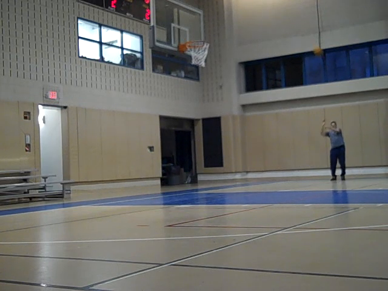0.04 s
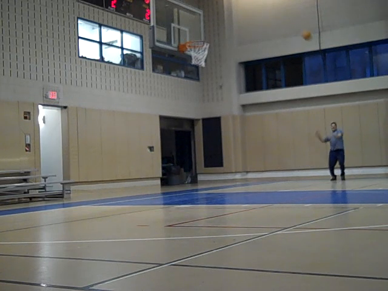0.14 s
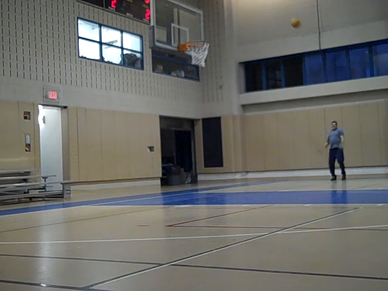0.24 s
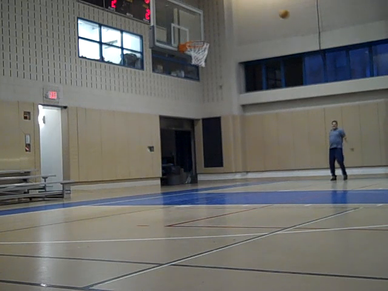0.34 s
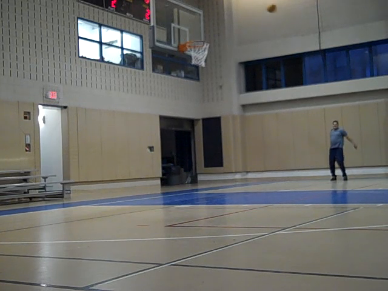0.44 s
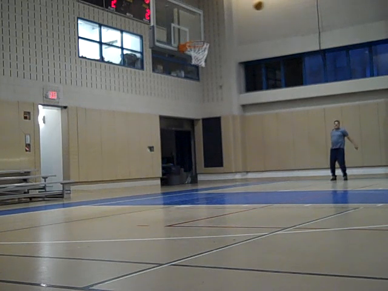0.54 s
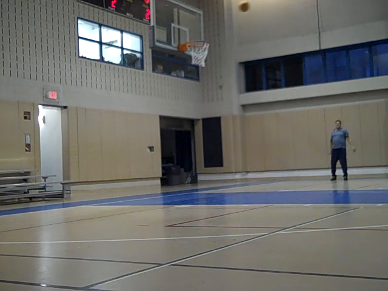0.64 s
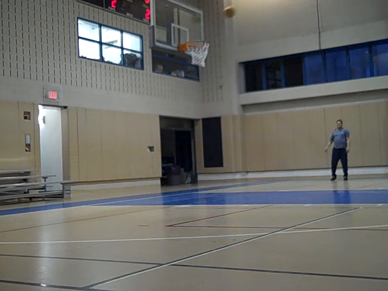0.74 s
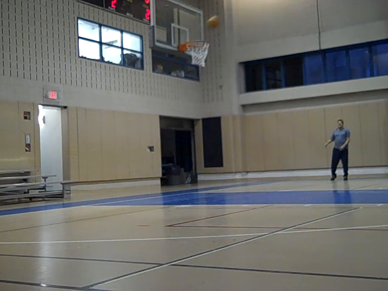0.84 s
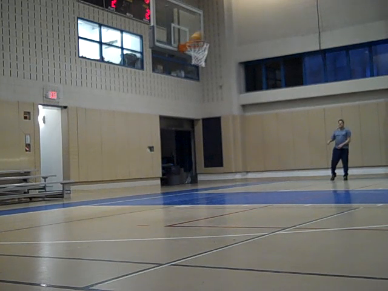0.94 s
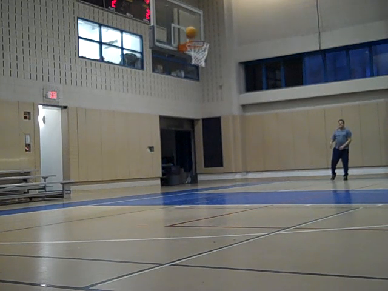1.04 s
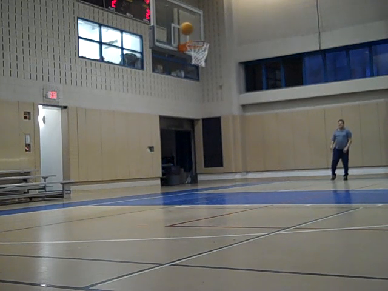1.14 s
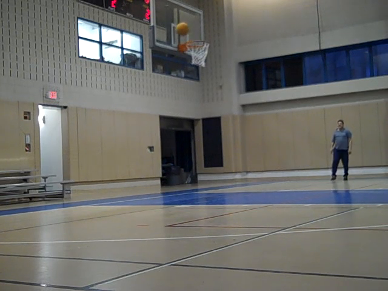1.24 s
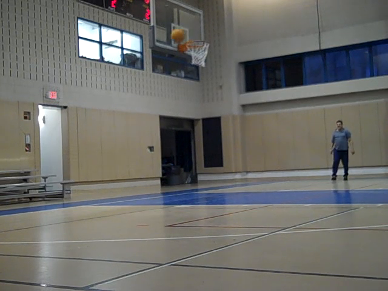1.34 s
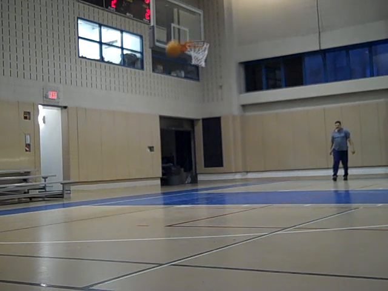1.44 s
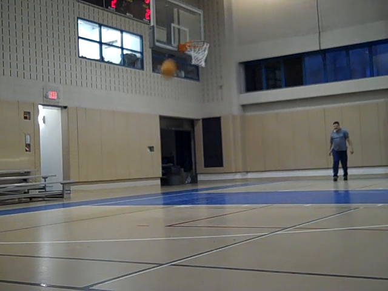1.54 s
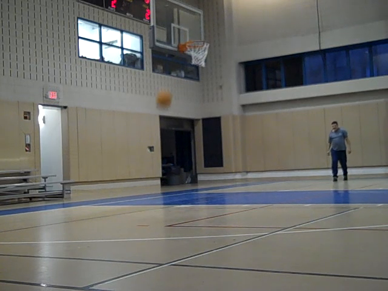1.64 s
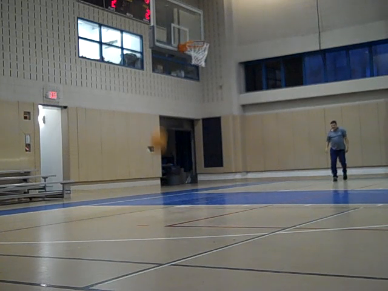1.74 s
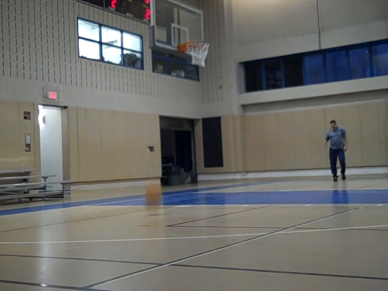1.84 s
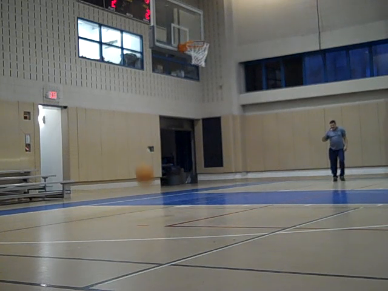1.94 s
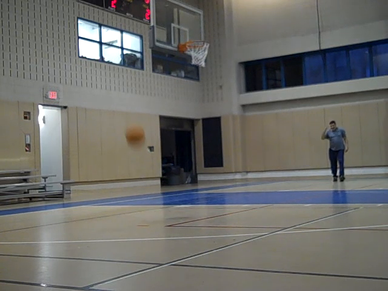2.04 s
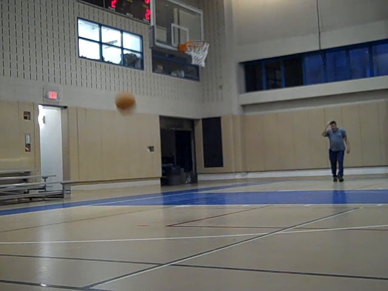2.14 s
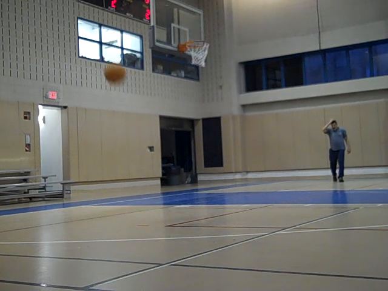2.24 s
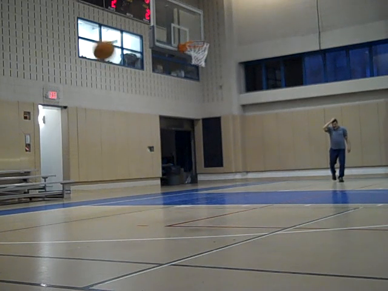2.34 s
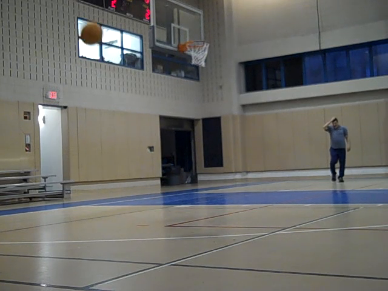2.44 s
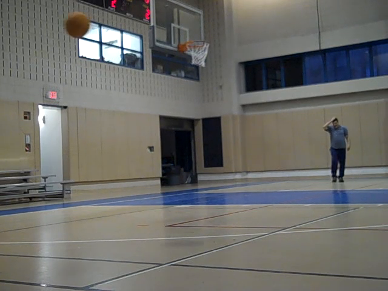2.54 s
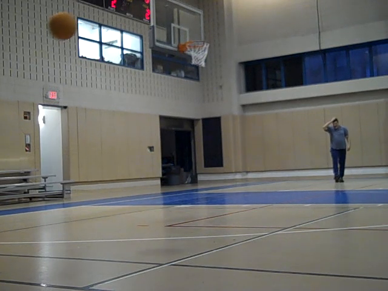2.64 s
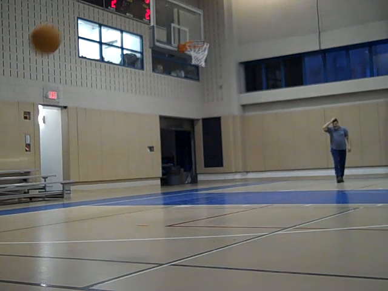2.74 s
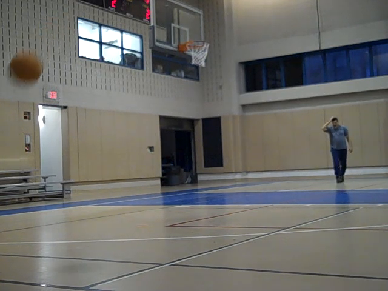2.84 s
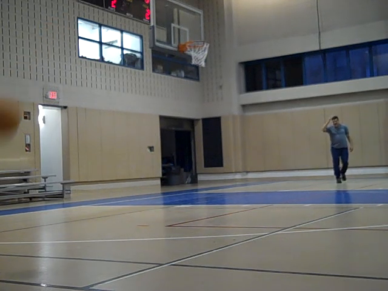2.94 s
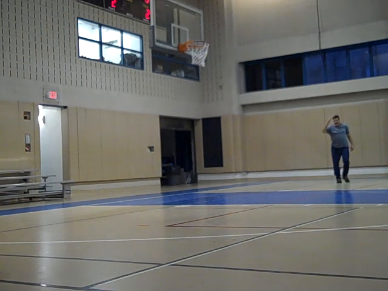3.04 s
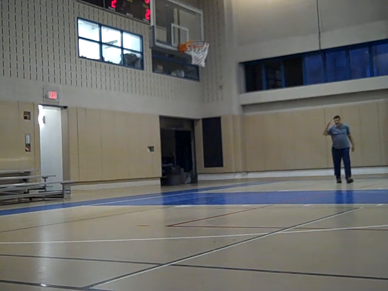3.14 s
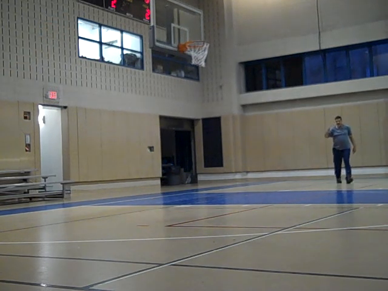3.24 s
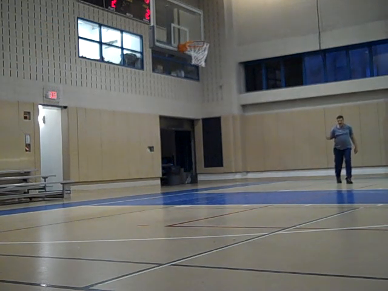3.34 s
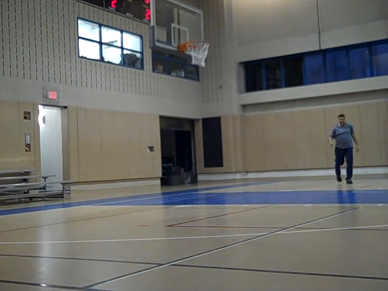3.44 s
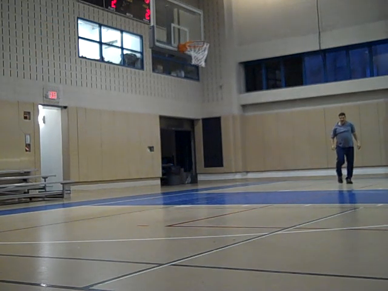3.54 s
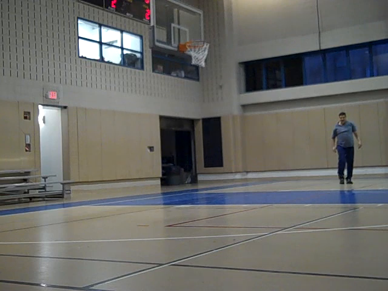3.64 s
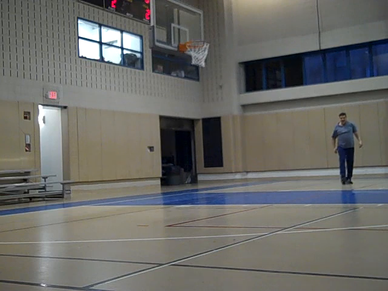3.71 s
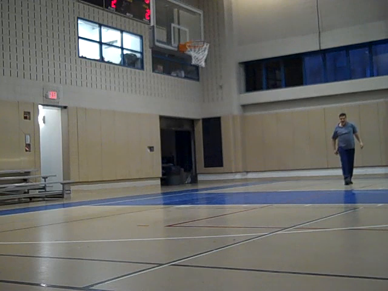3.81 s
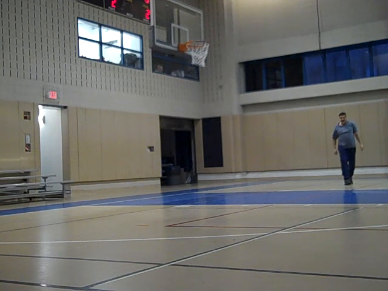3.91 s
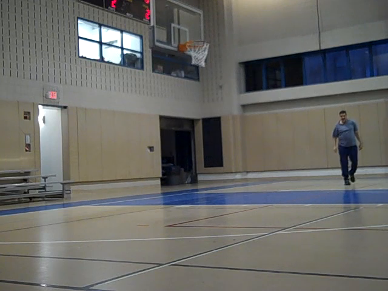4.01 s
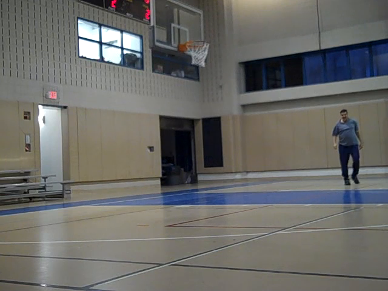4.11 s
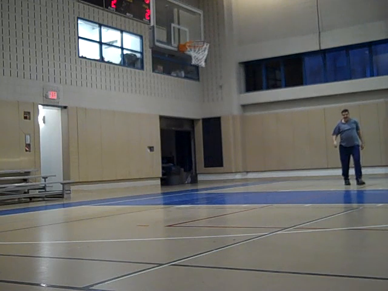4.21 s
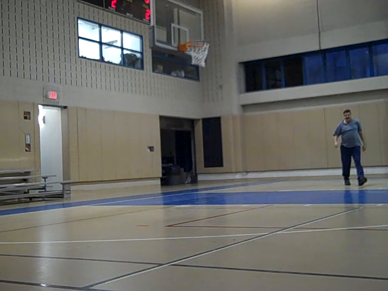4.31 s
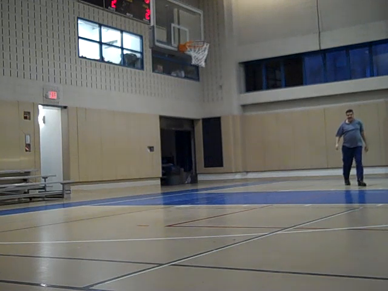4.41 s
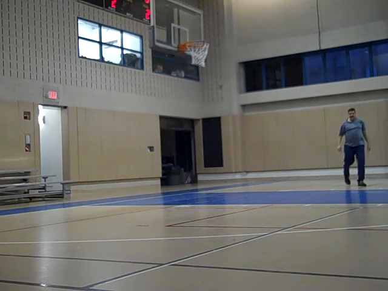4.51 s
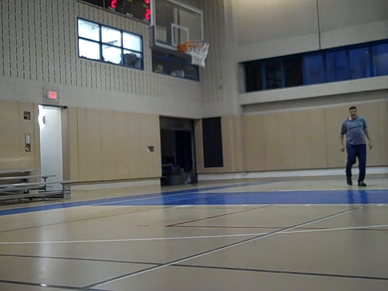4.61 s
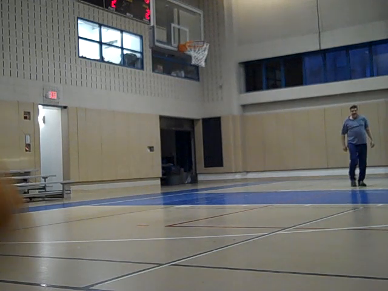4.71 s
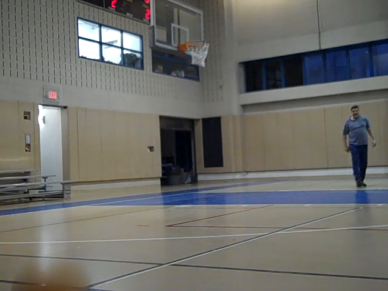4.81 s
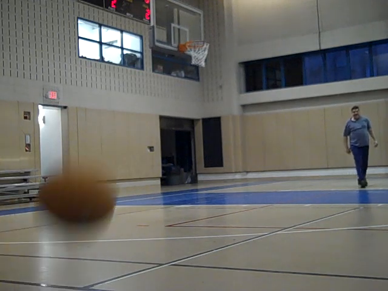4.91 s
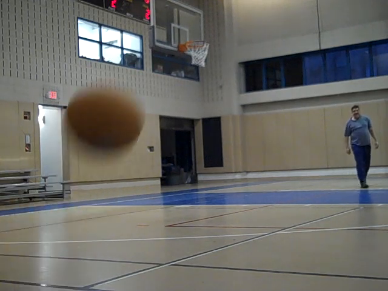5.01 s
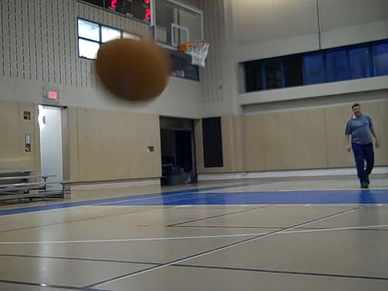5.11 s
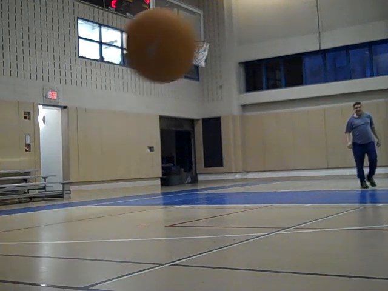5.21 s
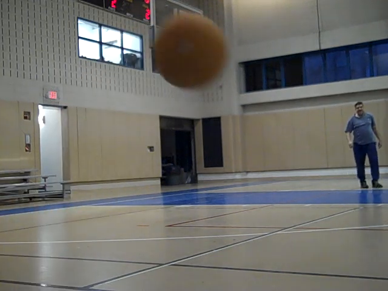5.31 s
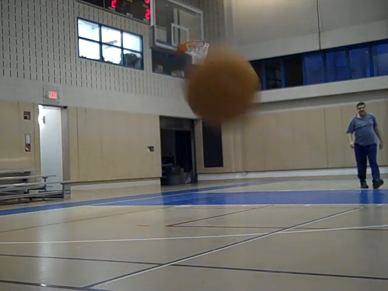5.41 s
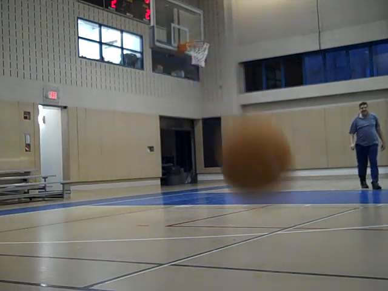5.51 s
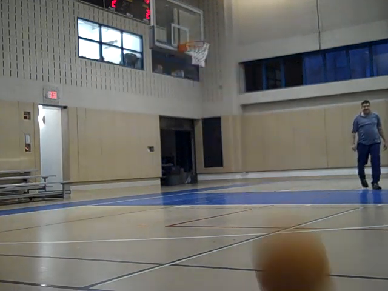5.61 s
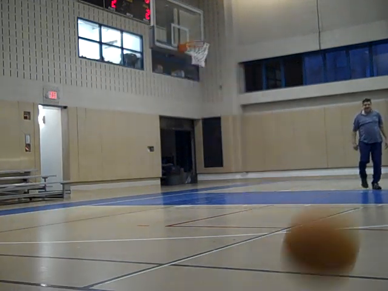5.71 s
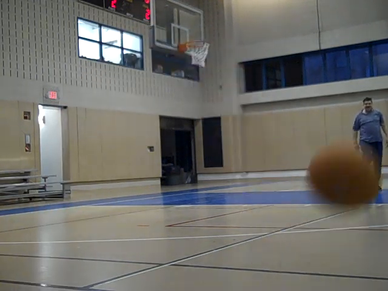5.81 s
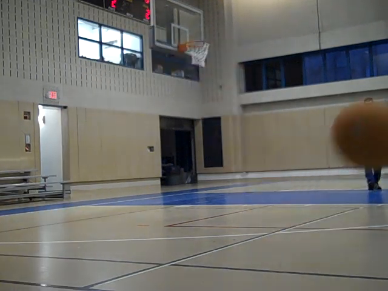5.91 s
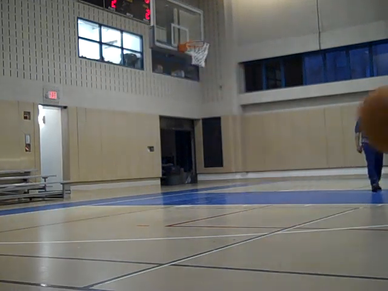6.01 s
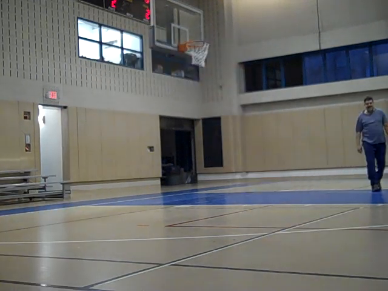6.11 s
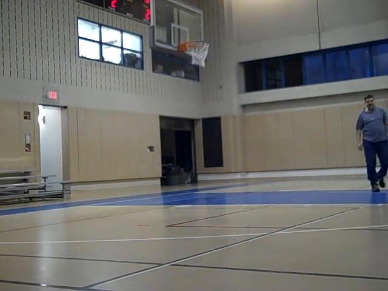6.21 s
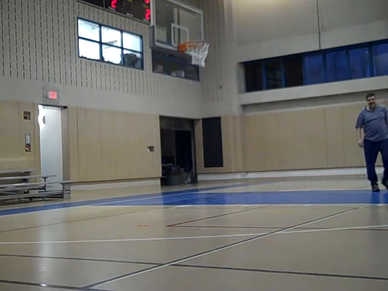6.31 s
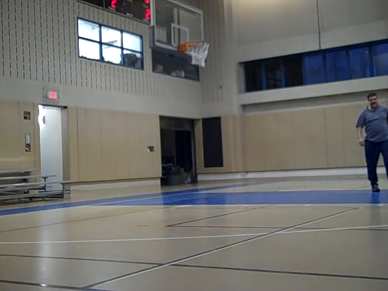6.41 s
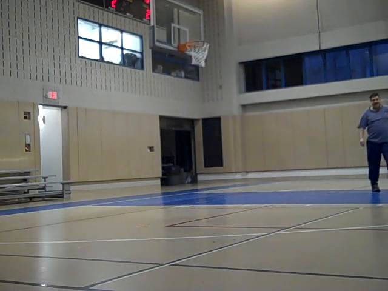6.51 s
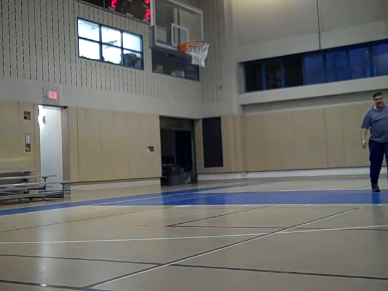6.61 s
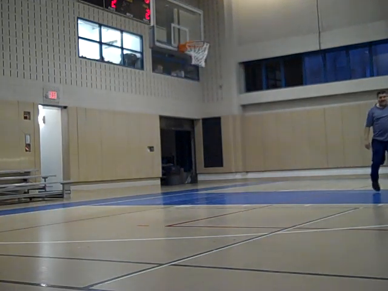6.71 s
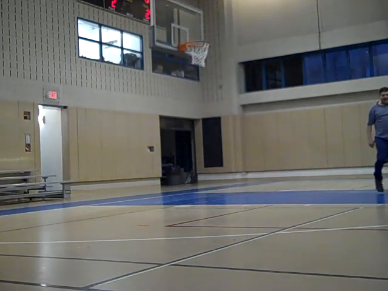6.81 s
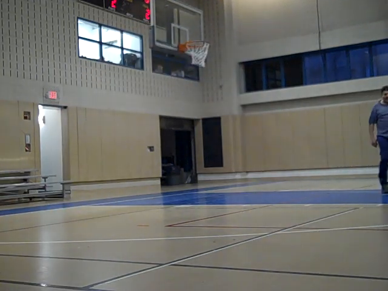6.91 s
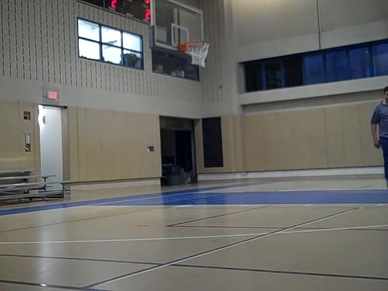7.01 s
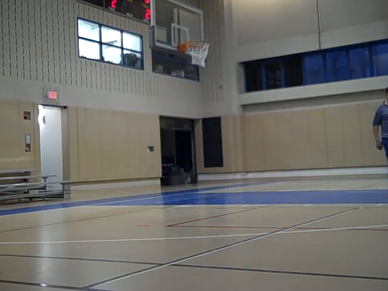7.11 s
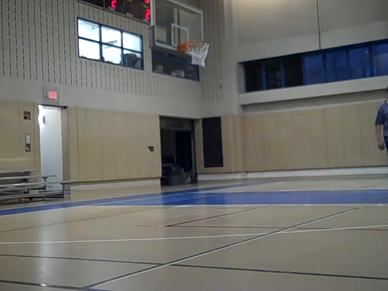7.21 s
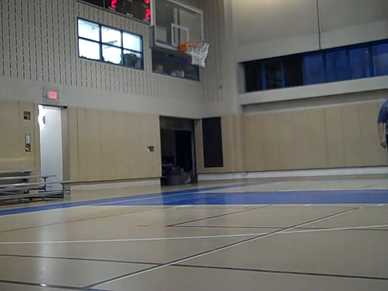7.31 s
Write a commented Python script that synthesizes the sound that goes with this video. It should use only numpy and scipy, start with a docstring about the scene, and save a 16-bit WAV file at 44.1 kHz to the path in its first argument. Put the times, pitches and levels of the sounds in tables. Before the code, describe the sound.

In a large empty gym, a distant rim clank and squeaky spring precede echoing basketball bounces, a booming wall hit and quickening, weakening floor slaps.

```python
"""In a big empty gym a basketball is shot: fingers flick it, shoes squeak, the rim knocks and its spring creaks.
The ball drops to the hard floor, bounces into a booming wall panel and hops past a microphone low on the court.
Blows are noise bursts and clicks shaped by spectra, plus decaying sines for ball, hoop and panel.
Squeaks and creaks are wavering tones with overtones; scuffs and the soft ventilation are filtered noise.
The blows, squeaks and creaks also feed a hall tail built from ragged, decaying noise bands."""
import sys
import numpy as np
from scipy import signal
from scipy.fft import rfft, irfft
from scipy.io import wavfile
from scipy.ndimage import uniform_filter1d

SR = 44100
rng = np.random.default_rng(int(sys.argv[2]) if len(sys.argv) > 2 else 0)


def store_wav(level_fs):
    """Save 16-bit WAV to argv[1]."""
    pcm = np.round(np.clip(np.atleast_2d(level_fs), -1, 1) * 32767)
    wavfile.write(sys.argv[1], SR, pcm.T.astype(np.int16))


N = 324135
T = np.arange(int(2.2 * SR)) / SR  # time axis of one event, s
TOP_HZ = 16000  # upper limit of the finished sound

# spectrum of the ventilation's air noise: f/Hz, relative level/dB
VENT_SPECTRUM = [(12, -19), (20, 8.5), (33, -14.5), (81, -6), (422, -9.5), (527, -14), (678, -12),
                 (780, -14.5), (1860, -17.5), (3530, -24), (6720, -29.5), (7310, -32), (14300, -36),
                 (16000, -37)]
# thin steady whines in the ventilation: f/Hz, RMS level/dB
VENT_WHINES = [(4802, -91), (6481, -89)]
# the hall's reverberation by band: f/Hz, t60/s, relative level/dB
HALL_BANDS = [(49.3, 0.83, -31), (111, 2.17, 3.5), (200, 1.34, 1.5), (420, 1.14, 5), (1040, 1.827, 1),
              (2000, 1.63, 4), (3250, 1.234, 0.5), (5840, 0.8, 1), (9500, 0.73, -3.5), (16000, 0.55, 2)]
# the ball leaving the fingers: t/s, relative level/dB
FINGER_FLICKS = [(.027, -17), (.042, -17.5)]
# faint bright ticks: t/s, relative level/dB
BRIGHT_TICKS = [(2.671, -45), (3.751, -45), (3.842, -47), (4.315, -42), (5.417, -44.5)]
# spectrum of a light contact: f/Hz, level/dB
TAP_SPECTRUM = [(80, -41), (450, -12), (740, 7), (1000, 3), (1400, 6), (2500, -16.5), (6000, -19),
                (10000, -33.5), (16000, -47)]
# one soft footfall: t/s, relative level/dB
STEP_S, STEP_DB = 6.768, -32
# shoe squeaks: t/s, length/s, f/Hz, relative level/dB
SHOE_SQUEAKS = [(0.206, 0.066, 1800, -60.5), (.39, 0.14, 2430, -68), (.36, 0.39, 2010, -70)]
SHOE_OVERTONE_DB = -13
# overtones of a squeak: multiple of the pitch, relative level/dB
SQUEAK_OVERTONES = [(2, -4.5), (3, -3.5), (4, -24), (5, -15), (6, -18.5), (7, -22)]
# soles scuffing the floor: t/s, length/s, relative level/dB, treble tilt/(dB per octave)
SOLE_SCUFFS = [(0.21, 0.052, -56, -2), (0.471, 0.066, -63.5, 0)]
# spectrum of rubber rubbing on the floor: f/Hz, level/dB
SCUFF_SPECTRUM = [(100, -25), (350, -4.5), (800, 4), (1400, 9), (2800, -7), (4000, 1), (6200, -5.5),
                  (8000, -9), (10000, 0), (13000, -14), (16000, -29)]
# spectrum of the blow on the rim: f/Hz, level/dB
RIM_SPECTRUM = [(60, -8), (300, -2), (700, -2), (1150, 3.5), (1700, -0.5), (2100, -3), (2500, -7.5),
                (2900, -4.5), (3400, -4.5), (4500, -11.5), (7000, -11), (10000, -7), (16000, -24)]
# ringing modes of the steel hoop: f/Hz, level/dB, t60/s
HOOP_MODES = [(1060, -41, 0.12), (1240, -45, 0.14), (1610, -49, 0.12), (2490, -49, 0.073),
              (3260, -50, 0.069)]
# creaks of the rim's spring, one at each swing: t/s, relative level/dB, overtone level/dB
SPRING_CREAKS = [(1.146, -50.5, -11), (1.266, -50.5, -8.5), (1.42, -59.5, 2), (1.556, -58, -5),
                 (1.705, -66.5, -20), (1.787, -59, -7.5)]
CREAK_HZ, CREAK_S = 1916, 0.042
# floor bounces: t/s, strength/dB, distance/m, near-wall echo delay/s,
# resonance of that spot of floor f/Hz, lift of that resonance level/dB
FLOOR_BOUNCES = [(1.9316, 3, 6.2, .026, 790, 8), (3.1630, -2, 3.4, 0.031, 2300, 1.5),
                 (4.8491, -6.5, 2.4, 0.046, 2000, 8.5), (5.7016, -9, 2.1, 0.044, 2240, 7),
                 (6.4132, -10, 2.4, .0505, 1150, -2), (7.0241, -11, 2.9, .0505, 1410, -5.5)]
# spectrum of rubber slapping the floor: f/Hz, level/dB
SLAP_SPECTRUM = [(40, -12.5), (85, 10), (160, -3.5), (280, 1), (450, -1.5), (700, 2), (1100, 8),
                 (2400, 2.5), (4000, 3), (7000, 1), (9300, 3), (12000, -5.5), (16000, -12.5)]
# modes of the air ringing inside the ball: f/Hz, relative level/dB, t60/s
BALL_MODES = [(763, -44.5, 0.23), (989, -34, 0.14), (1680, -56, 0.38), (2280, -47, 0.17),
              (2960, -35.5, 0.077), (4880, -63, .06), (6350, -37.5, .06)]
# colour of the near wall's echo: f/Hz, level/dB
NEAR_WALL_SPECTRUM = [(100, 4.5), (1000, 1.5), (5000, -0.5)]
# spectrum of the blow on the wall: f/Hz, level/dB
WALL_HIT_SPECTRUM = [(50, -19), (150, -3), (400, 1), (700, 4.5), (1300, 5.5), (2000, -1), (3000, -2),
                     (5000, -8), (9000, -10), (16000, -27)]
# spectrum of the wall's dull boom: f/Hz, level/dB
WALL_BOOM_SPECTRUM = [(50, -4), (130, -2.5), (280, 4), (550, 4), (800, -0.5), (1100, -18), (2000, -15),
                      (6000, -51)]
# ringing modes of the wall panel: f/Hz, relative level/dB, t60/s
PANEL_MODES = [(131, -30, 0.23), (183, -19, 0.31), (204, -4, 0.34), (293, 3.5, 0.44), (349, -8, 0.59),
               (393, -3, 0.32), (423, -5, 0.73), (493, 0, 0.22), (531, -5.5, 0.51), (607, -6, 0.43),
               (630, -7.5, 0.58), (710, -8, 0.3), (780, -2.5, 0.59), (812, -11.5, 1), (1006, -12, 0.59)]

# direct sound at NEAR_M; farther off it is weaker, and duller in dB per octave for each doubling
NEAR_M, DIRECT_DB, DULLING_DB = 2.49, 4, 0.6
# the thump is felt close by: bass lift at NEAR_M and its loss for each doubling of distance
THUMP_DB, THINNING_DB = 1, 8.5
# first echoes are faint in mid-court and grow for each doubling of distance towards the walls
EARLY_DB, EARLY_RISE_DB = -5.5, 2.5
# lift-off against the slap; near-wall echo for a detour of 1 m; roof flutter against the strength
LIFT_OFF_DB, ECHO_DB, ROOF_DB = -8, 7, -12
SOUND_M_PER_S = 343


def undb(db):
    """Decibels to gain."""
    return 10 ** (np.asarray(db) / 20)


def unit(x):
    """Scale to an energy of one."""
    return x / np.sqrt(np.sum(x ** 2))


def fade(t60, delay=0):
    """Exponential decay by 60 dB in t60 seconds, silent until the delay has passed."""
    return (T >= delay) * np.exp(-np.log(1000) * np.maximum(T - delay, 0) / t60)


def add(out, s, x):
    """Mix x into out from time s."""
    i = max(int(s * SR), 0)
    out[i:i + len(x)] += x[:max(len(out) - i, 0)]


def shape(points, hz):
    """Read (Hz, value) points on a log-frequency axis."""
    f, v = np.transpose(points)
    return np.interp(np.log(hz + 1), np.log(f), v)


def colour(x, points, tilt_db=0, peak_hz=1000, peak_db=0, bass_db=0, size=4096):
    """Minimum-phase filter from a spectrum, a tilt in dB per octave, one broad resonance and a bass shelf."""
    hz = np.arange(size // 2 + 1) * SR / size + 1
    db = shape(points, hz)
    db = db + tilt_db * np.log2(np.maximum(hz, 400) / 2000)
    db = db + peak_db * np.exp(-(np.log2(hz / peak_hz) / 0.53) ** 2)
    db = db + bass_db / (1 + (hz / 270) ** 4)
    # folding the cepstrum makes the filter causal, so blows keep a sharp front
    cepstrum = irfft(np.log(undb(db)))
    cepstrum[1:size // 2] *= 2
    cepstrum[size // 2 + 1:] = 0
    impulse = irfft(np.exp(rfft(cepstrum))).real
    return signal.fftconvolve(x, impulse)[:len(x)]


def burst(envelope, count=3):
    """A noisy blow: flatten the spectrum and reapply the envelope, count times over."""
    x = rng.standard_normal(len(T)) * envelope
    for _ in range(count):
        bins = rfft(x)
        flat = irfft(bins / (abs(bins) + 1e-12), len(T))
        x = flat * np.minimum(2 * envelope, 1)
    return unit(x)


def ring(modes):
    """Decaying sine modes that start at random phases in each blow."""
    out = 0
    for hz, db, t60 in modes:
        tone = np.sin(2 * np.pi * (hz * T + rng.random()))
        out = out + undb(db) * fade(t60) * tone
    return out


def ventilation():
    """Steady air noise with a slow, slight swell and two faint whines."""
    t = np.arange(N) / SR
    air = colour(rng.standard_normal(N), VENT_SPECTRUM)
    swell_db = .5 * np.interp(t, np.linspace(0, t[-1], 20), rng.standard_normal(20))
    whine = sum(undb(db) * np.sqrt(2) * np.sin(2 * np.pi * hz * t) for hz, db in VENT_WHINES)
    return undb(-64.5 + swell_db) * air / air.std() + whine


def ragged(grain):
    """Noise whose strength jumps every millisecond or two, like single echoes arriving."""
    jumps = np.repeat(rng.standard_normal(len(T) // 64 + 1), 64)[:len(T)]
    return rng.standard_normal(len(T)) * np.exp(grain * jumps - grain ** 2)


def hall(x, early_db=-4, far_s=0.11, grain=0.29):
    """Near walls answer first, far walls and roof from far_s; echoes merge into a tail that loses its treble."""
    bins = rfft(ragged(grain * fade(1.7)))
    hz = np.arange(len(bins)) * SR / len(T)
    centres = np.transpose(HALL_BANDS)[0]
    tail = 0
    # each row of the identity matrix is one overlapping band
    for (_, t60, db), band in zip(HALL_BANDS, np.eye(len(HALL_BANDS))):
        band_noise = irfft(bins * shape(np.c_[centres, band], hz), len(T))
        tail = tail + undb(db) * fade(t60) * band_noise
    onset = np.minimum(T / 0.0055, 1)
    arrival = onset * np.where(T < far_s, undb(early_db), 1)
    return signal.fftconvolve(x, tail * arrival / np.sqrt(SR / 10))[:len(x)]


def tap(t60, hall_db, tilt_db):
    """A short light contact: a decaying noise burst and its answer from the hall."""
    x = colour(burst(fade(t60)), TAP_SPECTRUM, tilt_db)
    return x + undb(hall_db) * hall(x)


def touches():
    """Far fingers flick the ball, small things tick close by, and a foot lands with a dull pat."""
    out = np.zeros(N)
    for s, db in FINGER_FLICKS:
        add(out, s, undb(db) * tap(t60=0.023, hall_db=3.0, tilt_db=2.5))
    for s, db in BRIGHT_TICKS:
        add(out, s, undb(db) * tap(t60=.06, hall_db=4.5, tilt_db=16))
    add(out, STEP_S, undb(STEP_DB) * tap(t60=0.092, hall_db=-15.0, tilt_db=-10.0))
    return out


def squeaks(rows, waver, size=150):
    """Stick-slip tones that swell and stop; pitch wavers with a random grip, smoothed over size samples."""
    out = np.zeros(N)
    for s, length, hz, db, overtone_db in rows:
        grip = uniform_filter1d(rng.standard_normal(len(T)), size=size)
        pitch = hz * (1 + waver * grip / grip.std())
        phase = 2 * np.pi * np.cumsum(pitch)[T < length] / SR
        overtones = sum(undb(overtone_db + d) * np.sin(round(k) * phase) for k, d in SQUEAK_OVERTONES)
        tone = np.sin(phase) + overtones
        add(out, s, undb(db) * tone * np.sqrt(2 * np.hanning(len(tone))))
    return out


def scuffs():
    """Soles rub over the floor in short swells of grainy noise."""
    out = np.zeros(N)
    for s, length, db, tilt_db in SOLE_SCUFFS:
        rub = colour(rng.standard_normal(len(T)), SCUFF_SPECTRUM, tilt_db)[T < length]
        add(out, s, undb(db) * rub / rub.std() * np.hanning(len(rub)))
    return out


def rim():
    """A distant glancing knock on the steel hoop, which rings and rattles briefly on its mount."""
    knock = colour(1. * (T == 0), RIM_SPECTRUM)
    rattle = colour(burst(fade(0.066)), RIM_SPECTRUM, peak_hz=1300, peak_db=2.7)
    out = undb(-21) * knock + undb(-10.5) * rattle + ring(HOOP_MODES)
    return out + undb(-5) * hall(knock, early_db=-1.0, grain=0.44)


def spring(twin_ratio=.97, twin_db=-3.5):
    """The spring creaks at each swing; a second coil sings a little lower and beats against the first."""
    coil = [(s, CREAK_S, CREAK_HZ, db, overtone_db) for s, db, overtone_db in SPRING_CREAKS]
    # the second coil has no overtones
    twin = [(s, CREAK_S, CREAK_HZ * twin_ratio, db + twin_db, -np.inf) for s, db, _ in SPRING_CREAKS]
    return squeaks(coil + twin, waver=.008, size=30)


def bounce(strength_db, distance_m, echo_s, slap_hz, slap_db, contact_s=.0132):
    """The skin slaps flat, the air inside rings, the floor shudders, and the skin snaps back at lift-off."""
    doublings = np.log2(distance_m / NEAR_M)
    tilt_db = -DULLING_DB * doublings
    bass_db = THUMP_DB - THINNING_DB * doublings
    click = 1. * (T == 0)
    flatten = burst(np.exp(-(T / .0028) ** 4) + .2 * fade(.03), count=6)
    slap = colour(unit(flatten + .5 * click), SLAP_SPECTRUM, tilt_db, slap_hz, slap_db, bass_db)
    snap = burst(np.exp(-abs(T - contact_s) / 0.00098))
    lift = undb(LIFT_OFF_DB) * colour(snap, SLAP_SPECTRUM, tilt_db - 4.0, 1300, 4.7, bass_db)
    shudder = undb(-4) * colour(burst(fade(0.17)), SLAP_SPECTRUM, tilt_db - 3.0, 340, 3.3, bass_db)
    air = ring(BALL_MODES)
    direct_gain = undb(DIRECT_DB) * NEAR_M / distance_m
    out = direct_gain * (slap + lift + shudder + undb(-1.5) * air)
    # the hall takes in the blow from all sides, as one even crack
    crack = colour(click, SLAP_SPECTRUM, tilt_db - .6, slap_hz, 0.49 * slap_db, bass_db=-4)
    early_db = EARLY_DB + EARLY_RISE_DB * doublings
    out += hall(crack + undb(-7) * air, early_db=early_db, grain=0.4)
    # the near wall returns the slap and the lift-off, weaker the longer the detour
    echo = colour(crack + .5 * slap + lift, NEAR_WALL_SPECTRUM)
    detour_m = SOUND_M_PER_S * echo_s
    add(out, echo_s, undb(ECHO_DB) / detour_m * echo)
    return undb(strength_db) * (out + undb(ROOF_DB) * roof(tilt_db))


def roof(tilt_db, trip_s=0.1025, loss_db=-11.0, count=3):
    """The blow flutters between floor and roof; the beams break each return into a ragged cluster."""
    out = np.zeros(len(T))
    for trip in range(count):
        beams = np.exp(-((T - trip_s * (trip + 1) - .004) / 0.018) ** 2)
        out += undb(trip * loss_db) * unit(beams * ragged(0.58))
    return colour(out, SLAP_SPECTRUM, tilt_db - .9, 2600, 2.8, bass_db=-10)


def wall():
    """The ball hits the wall: the facing rattles, then the panel's boom swells through the hall."""
    rattle = undb(-12.0) * burst(fade(0.019))
    rattle = rattle + undb(2.5) * burst(fade(0.2))
    rattle = rattle + undb(-3) * burst(fade(0.29, delay=0.016))
    hit = colour(rattle, WALL_HIT_SPECTRUM)
    click = 1. * (T == 0)
    crack = colour(click, WALL_HIT_SPECTRUM, tilt_db=-1.64)
    out = hit + undb(-2.0) * hall(crack, early_db=3.5)
    boom = colour(burst(fade(0.34)), WALL_BOOM_SPECTRUM)
    # the panel's modes swell in rather than start at once
    panel = undb(-35.5) * ring(PANEL_MODES) * (1 - fade(.1))
    thud = colour(click, WALL_BOOM_SPECTRUM)
    boom_in_hall = hall(thud + panel / 4, early_db=0)
    add(out, .066, undb(0.5) * boom + panel + undb(2.0) * boom_in_hall)
    return out


def scene():
    """The shot, the rim, the bounces and the wall in one hall, over ventilation."""
    out = ventilation()
    out += touches()
    shoe_rows = [(*row, SHOE_OVERTONE_DB) for row in SHOE_SQUEAKS]
    shoes = squeaks(shoe_rows, waver=.034) + scuffs()
    out += undb(-3.5) * shoes + undb(5.5) * hall(shoes, early_db=-2.5)
    add(out, 1.0078, rim())
    creaks = spring()
    out += undb(-3.0) * creaks + undb(-3) * hall(creaks, early_db=1.5)
    for s, *blow in FLOOR_BOUNCES:
        add(out, s, bounce(*blow))
    add(out, 4.0162, wall())
    return out[None]


def record(dry):
    """A steep elliptic low-pass removes the treble above TOP_HZ."""
    return signal.sosfilt(signal.ellip(8, .2, 70, TOP_HZ, fs=SR, output="sos"), dry)


dry = scene()
out = record(dry)
store_wav(out)
```